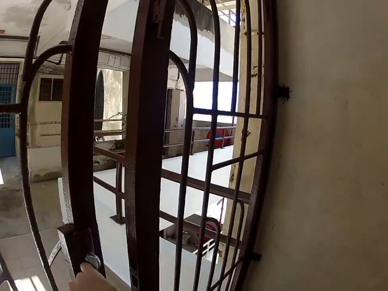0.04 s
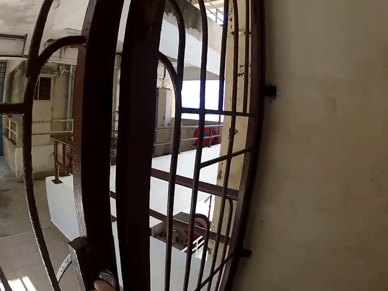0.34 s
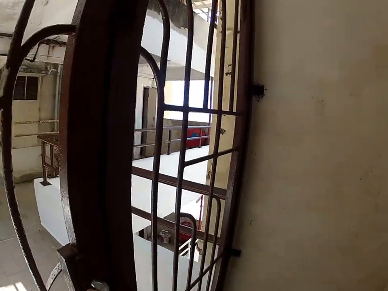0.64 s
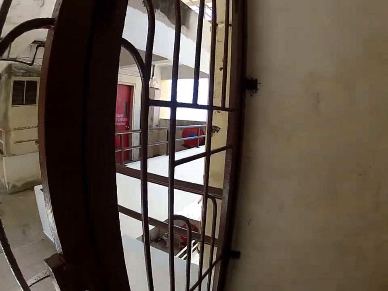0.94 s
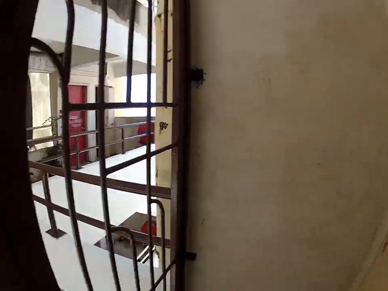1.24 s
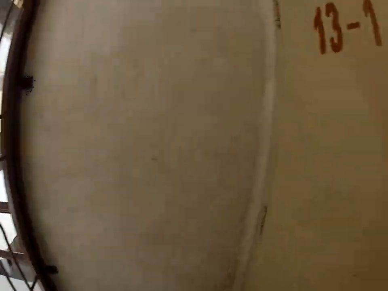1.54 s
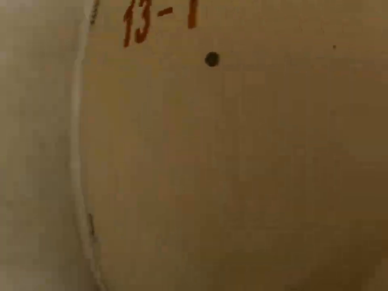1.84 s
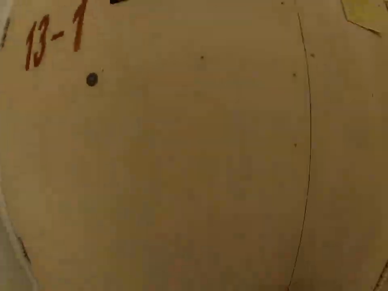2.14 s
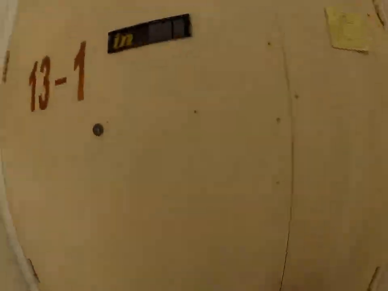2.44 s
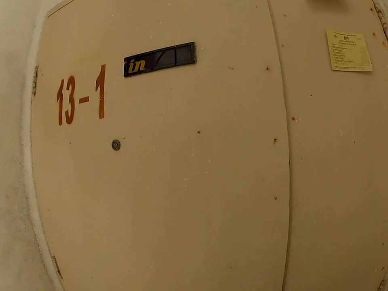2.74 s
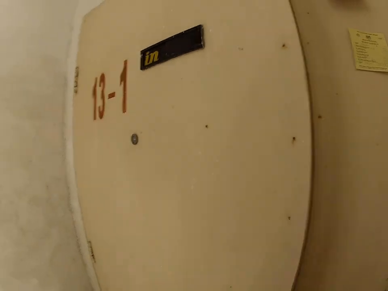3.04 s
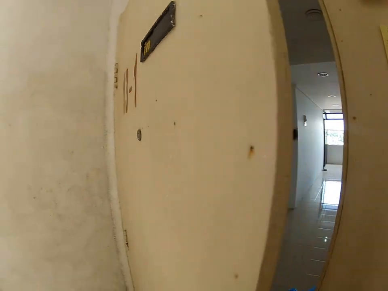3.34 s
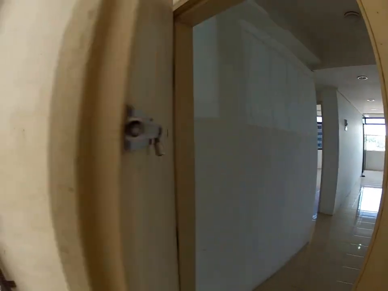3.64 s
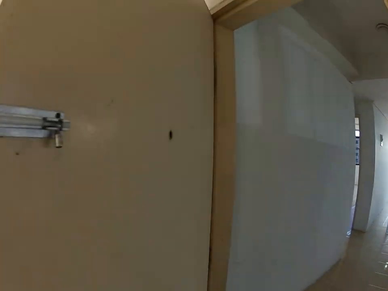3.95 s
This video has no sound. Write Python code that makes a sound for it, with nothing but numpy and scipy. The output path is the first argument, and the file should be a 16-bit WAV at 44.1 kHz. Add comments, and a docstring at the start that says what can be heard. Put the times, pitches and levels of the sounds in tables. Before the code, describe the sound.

A barred metal gate rattles and bangs shut, then a wooden door clunks open.

```python
"""Steel gate and wooden door in a corridor

A barred steel gate shudders on its hinges, bangs into its frame and rattles to rest, each impact
exciting the modes of its bars. Then a handle is worked; a wooden door thumps in its frame, comes free
with a clunk and swings open. Concrete walls reverberate, and a low-rate sample-and-hold mirrors
the spectrum into a glassy treble."""
import sys
import numpy as np
from scipy import signal
from scipy.fft import rfft, irfft
from scipy.io import wavfile
from scipy.ndimage import uniform_filter1d

SR = 44100
rng = np.random.default_rng(int(sys.argv[2]) if len(sys.argv) > 2 else 0)


def wrap_up_sound(samples):
    """Save the sound to the file named by the first command line argument, as 16-bit audio."""
    columns = np.atleast_2d(samples).T
    # keep every value between -1 and 1, then stretch to whole-number steps
    tamed = np.clip(columns, -1, 1)
    steps = np.round(tamed * 32767).astype(np.int16)
    wavfile.write(sys.argv[1], SR, steps)


N = 176400
T = np.arange(N) / SR

# bright snap as two metal parts first touch: frequency_hz, density_db
SNAP_SPECTRUM = [(1000, -24), (3000, -5), (5500, -12)]
# handle and latch metal: frequency_hz, density_db
LATCH_SPECTRUM = [(150, -25), (600, 0.5), (1300, 4.5), (2000, -6), (3000, -8.5), (4000, -17), (5600, -21)]
SNAP_T60_S = 0.031


def amp(db):
    """Decibels to amplitude ratio."""
    return 10 ** (np.asarray(db) / 20)


def unit(x):
    """Normalisation to rms 1."""
    return x / np.sqrt(np.mean(x ** 2) + 1e-20)


def read(points, hz):
    """Interpolation on a logarithmic frequency axis."""
    f, value = np.transpose(points)
    return np.interp(np.log(hz + 1), np.log(f + 1), value)


def add(mix, start_s, sound):
    """Superposition of a delayed sound on the mix."""
    part = mix[max(round(start_s * SR), 0):][:len(sound)]
    part += sound[:len(part)]


def noise(spectrum, size):
    """Random phases under a given spectrum make coloured noise, rms 1."""
    hz = np.fft.rfftfreq(size, 1 / SR)
    return unit(irfft(amp(read(spectrum, hz)) * np.exp(2j * np.pi * rng.random(len(hz))), size))


def wander(rate_hz, size):
    """Low-passed noise gives a smooth random fluctuation, rms 1."""
    hz = np.fft.rfftfreq(size, 1 / SR)
    spectrum = np.exp(-(hz / rate_hz) ** 2 + 2j * np.pi * rng.random(len(hz)))
    return unit(irfft(spectrum * (hz > 0), size))


def burst(spectrum, t60, rise_s, size=32768):
    """Densely overlapping modes act as noise, each band decaying at its own rate."""
    hz, t, bands = signal.stft(noise(spectrum, size), SR, nperseg=256)
    decay = amp(-60 * t / np.maximum(read(t60, hz), 1e-3)[:, None])
    sound = signal.istft(bands * decay, SR, nperseg=256)[1][:size]
    return sound * np.minimum(T[:size] / rise_s, 1)


def ring(modes, rise_s, size=44100, scatter=1):
    """Free vibration is a sum of damped sinusoids; with no scatter they start in phase."""
    hz, db, t60 = np.transpose(modes)[:, :, None]
    t, gain = T[:size], amp(db) / np.linalg.norm(amp(db))
    cycles = hz * t + scatter * rng.random(hz.shape)
    waves = gain * amp(-60 * t / t60) * np.sin(2 * np.pi * cycles)
    return np.sqrt(2) * waves.sum(0) * np.minimum(t / rise_s, 1)


def air():
    """Ambient noise: the dull, nearly steady rumble of the open building."""
    # rumble colour: frequency_hz, density_db
    spectrum = [(15, -41), (28, -4.5), (45, -2), (78, 0), (105, -11.5), (141, 0), (200, -9), (255, -7.5),
                (297, -5.5), (340, -12.5), (570, -14.5), (700, -23.5), (1100, -25), (1450, -31),
                (1900, -39.5), (2400, -41), (4000, -51), (5400, -54)]
    # rumble envelope: time_s, level_db
    levels = [(0, -34), (1.2, -34.5), (1.7, -34.5), (2.3, -33), (2.6, -33), (3.0, -33.5), (3.4, -33.5),
              (4, -34.5)]
    return unit(noise(spectrum, N)) * amp(np.interp(T, *np.transpose(levels)))


def corridor(x):
    """Reverberation: convolution with the diffuse reflections from concrete walls."""
    # colour of the reflections: frequency_hz, density_db
    spectrum = [(60, 1), (400, -2), (1500, -10), (5500, -7)]
    # reverberation times: frequency_hz, t60_s
    decay = [(100, 1), (500, 0.63), (1500, 0.88), (5000, 0.39)]
    tail = burst(spectrum, decay, rise_s=0.014, size=44100)
    return signal.fftconvolve(x, tail / np.linalg.norm(tail))[:N]


def ticks(rustle_db=-6):
    """Close ticks are heard as direct sound only: a heavily damped pulse and a brief rustle."""
    # ticks: start_s, level_db
    events = [(2.178, -28.5), (3.3745, -20), (3.5498, -17)]
    # modes of the pulse: pitch_hz, level_db, t60_s
    modes = [(430, 1, 0.017), (820, 1.5, 0.0093), (1340, 1, 0.0066), (2400, -12.5, .006),
             (4520, -27, 0.0017)]
    # rustle colour: frequency_hz, density_db
    spectrum = [(100, 3), (500, 19), (1200, -3.5), (2500, -9.5), (5500, -37.5)]
    # rustle damping: frequency_hz, t60_s
    decay = [(300, 0.027), (1200, 0.013), (5000, 0.0078)]
    out, t = np.zeros(N), T[:4096]
    pulse = sum(amp(db - 60 * t / t60) * np.sin(2 * np.pi * hz * t) for hz, db, t60 in modes)
    for s, db in events:
        rustle = amp(rustle_db) * burst(spectrum, decay, rise_s=0.0004, size=4096)
        add(out, s, amp(db) * (pulse / abs(pulse).max() + rustle))
    return out


def bolt_scrape(level_db=-46, grain_db=4):
    """Sliding friction: the bolt drags on its plate, swelling with pressure until it slips."""
    # friction envelope: time_s, gain_db
    drag = [(2.5, -51), (2.57, -11.5), (2.67, 0), (2.72, 1), (2.85, -50), (3.12, -50), (3.18, -2),
            (3.21, 12.5), (3.25, -37)]
    swell_db = np.interp(T, *np.transpose(drag))
    return amp(level_db + swell_db) * noise(LATCH_SPECTRUM, N) * unit(amp(grain_db * wander(150, N)))


def panel_drone(pitch_hz=144.8, waver_hz=4):
    """Forced vibration: the door panel drones while the handle is pressed down."""
    # drone envelope: time_s, level_db
    levels = [(2.48, -70), (2.51, -34), (2.65, -29), (2.72, -51)]
    envelope = amp(np.interp(T, *np.transpose(levels))) * (T > levels[0][0]) * (T < levels[-1][0])
    cycles = np.cumsum(pitch_hz + waver_hz * wander(21, N)) / SR
    return envelope * np.sqrt(2) * np.sin(2 * np.pi * cycles)


def door_thumps(rise_s=0.0054):
    """Impact on the frame starts the door's low modes in phase, with a broadband knock."""
    # impacts: start_s, panel_db, sway_db, knock_db
    thumps = [(2.488, -25.5, -21.5, -38.5), (2.732, -18, -19, -22.5), (2.745, -20, -34, -32),
              (2.80, -45, -28, -30.5), (2.865, -23, -30, -53), (2.954, -30, -40, -54),
              (3.053, -14.5, -36, -28), (3.119, -22.5, -45, -32.5), (3.232, -25.5, -14, -17.5)]
    # panel modes: pitch_hz, level_db, t60_s
    panel = [(167.3, -0.5, 0.22), (265.7, -20.5, 0.29), (348, -17, 0.23), (441, -21.5, 0.16)]
    # swaying modes: pitch_hz, level_db, t60_s
    sway = [(48, 5, 0.11), (69.6, 7.5, 0.11)]
    # knock colour: frequency_hz, density_db
    knock = [(40, -25), (120, 5.5), (330, -0.5), (700, -7), (1300, -14.5), (2000, -39), (5000, -36)]
    # knock damping: frequency_hz, t60_s
    decay = [(100, 0.14), (500, 0.24), (2000, 0.14)]
    out = np.zeros(N)
    for s, panel_db, sway_db, knock_db in thumps:
        add(out, s, amp(panel_db) * ring(panel, rise_s, size=22050, scatter=0))
        add(out, s, amp(sway_db) * ring(sway, rise_s, size=22050, scatter=0))
        add(out, s, amp(knock_db) * burst(knock, decay, rise_s=0.0011, size=16384))
    return out


def handle(snap_db=-13.5):
    """Brief metal contacts in the latch give broadband clicks; the handle's spring resonates."""
    # latch contacts: start_s, level_db, t60_s
    clicks = [(2.686, -30, 0.14), (2.702, -32, 0.19), (2.733, -52, .12), (2.7918, -34, .06),
              (2.804, -40, .12), (3.0503, -41.5, 0.057), (3.2114, -18.5, 0.19), (3.562, -40, .06),
              (3.6416, -40.5, 0.06), (3.652, -46, 0.087), (3.7673, -40, 0.076)]
    # spring chirps: start_s, level_db
    chirps = [(2.5727, -47), (2.593, -46), (2.6276, -45)]
    # spring modes: pitch_hz, level_db, t60_s
    spring = [(1850, 2, .07), (1766, 2, 0.079), (2710, -17, .04)]
    out = np.zeros(N)
    for s, db, t60 in clicks:
        click = burst(LATCH_SPECTRUM, [(1000, t60)], rise_s=0.0013, size=16384)
        snap = burst(SNAP_SPECTRUM, [(1000, SNAP_T60_S)], rise_s=0.0004, size=4096)
        add(out, s, amp(db) * click)
        add(out, s, amp(db + snap_db) * snap)
    for s, db in chirps:
        add(out, s, amp(db) * ring(spring, rise_s=0.0023, size=8192))
    return out


def door_release():
    """Transient excitation: the door jerks free in three clunks, each duller than the last."""
    # clunks: start_s, level_db, tilt_db_per_octave
    clunks = [(3.218, -13.5, 4), (3.238, -18.5, -1), (3.258, -24.5, -8)]
    # modes of a clunk: pitch_hz, level_db, t60_s
    modes = [(253.4, -1.5, 0.2), (317, -1.5, 0.17), (463, -0.5, 0.14), (630, 1.5, .1), (942, -3.5, .1),
             (1010, -6.5, 0.063), (1160, -4.5, .1), (1477, -5, 0.076), (1770, -18, 0.14),
             (1946, -8.5, 0.047), (2800, -11.5, 0.038), (3050, -18, 0.043)]
    out = np.zeros(N)
    for s, db, tilt in clunks:
        tilted = [(hz, level + tilt * np.log2(hz / 1000), t60) for hz, level, t60 in modes]
        add(out, s, amp(db) * ring(tilted, rise_s=0.0032, size=16384))
    return out


def bar_singing(centre_hz=4540, width_hz=880):
    """The bars sing faintly in a narrow band: a high tone, amplitude-modulated by noise."""
    # singing envelope: time_s, level_db
    levels = [(.9, -71.5), (1.17, -64.5), (1.4, -69), (1.65, -70), (1.9, -80)]
    band = np.sqrt(2) * wander(width_hz / 2, N) * np.sin(2 * np.pi * centre_hz * T)
    return band * amp(np.interp(T, *np.transpose(levels)))


def gate_hum(waver_db=2, waver_hz=3, fade_db_per_s=100):
    """The gate's fundamental mode wavers in pitch and level as it swings."""
    # course of the fundamental: time_s, pitch_hz, level_db
    course = [(0, 128.7, -41.5), (.17, 123.8, -42), (.28, 126.1, -32.5), (.55, 125.1, -32.5),
              (.68, 130.5, -33.5), (.9, 135.3, -31.5), (1.1, 134.5, -45.5), (1.348, 130, -54),
              (1.552, 133, -41), (1.85, 140, -52)]
    s, hz, db = np.transpose(course)
    cycles = np.cumsum(np.interp(T, s, hz) + waver_hz * wander(9.8, N)) / SR
    level_db = np.interp(T, s, db) + waver_db * wander(21, N) - fade_db_per_s * np.maximum(T - s[-1], 0)
    return np.sqrt(2) * np.sin(2 * np.pi * cycles) * amp(level_db)


def gate_throb(beat_hz=6.62, twin_db=-3.5, waver_hz=1.96, fade_db_per_s=130):
    """Beating: two close modes of the uprights interfere at their difference frequency."""
    # course of the upper mode: time_s, pitch_hz, level_db
    course = [(0, 303, -26.5), (.25, 303, -31), (.5, 302, -38.5), (.62, 290, -35), (.85, 288, -28.5),
              (1.03, 289, -34), (1.3, 289, -40), (1.7, 290, -44)]
    s, hz, db = np.transpose(course)
    cycles = np.cumsum(np.interp(T, s, hz) + waver_hz * wander(7.1, N)) / SR
    pair = np.sin(2 * np.pi * cycles) - amp(twin_db) * np.sin(2 * np.pi * (cycles - beat_hz * T))
    return pair * amp(np.interp(T, s, db) - fade_db_per_s * np.maximum(T - s[-1], 0))


def steel_impacts(blows, modes, dense_modes, contact, snap_db, detune=0.0028, grain_db=2.5):
    """Impact excitation: each contact gives a gritty clash and a snap, then the bars ring freely."""
    # damping of the strong modes: frequency_hz, t60_s
    mode_decay = [(300, 0.65), (400, 0.92), (900, 0.54), (1500, 0.45), (3000, 0.38)]
    # damping of the dense modes: frequency_hz, t60_s
    dense_decay = [(150, 0.9), (350, 1), (800, 0.88), (1400, 0.48), (2500, 0.47), (5000, 0.59)]
    # damping of the clash: frequency_hz, t60_s
    clash_decay = [(300, 0.068), (1500, 0.21), (5000, 0.1)]
    out = np.zeros(N)
    for s, ring_db, clash_db in blows:
        # the changing contact shifts each mode from blow to blow
        bars = [(hz * (1 + detune * rng.standard_normal()), db, read(mode_decay, hz)) for hz, db in modes]
        clash = burst(contact, clash_decay, rise_s=0.00027, size=8192)
        grit = unit(amp(grain_db * wander(430, len(clash))))
        snap = burst(SNAP_SPECTRUM, [(1000, SNAP_T60_S)], rise_s=0.00037, size=4096)
        add(out, s, amp(clash_db) * clash * grit)
        add(out, s, amp(clash_db + snap_db) * snap)
        add(out, s, amp(ring_db - 3) * burst(dense_modes, dense_decay, rise_s=0.0033))
        add(out, s, amp(ring_db - 2) * ring(bars, rise_s=0.0033))
    return out


def gate_shudder():
    """Repeated impacts at the hinges excite the modes of the swinging leaf."""
    # hinge impacts: start_s, ring_db, clash_db
    blows = [(0.0, -21, -23.5), (0.02, -19.5, -31), (0.045, -27, -34), (0.078, -26, -43), (0.108, -30, -30),
             (0.135, -26, -46), (0.1805, -26, -45), (0.235, -39, -51), (0.342, -36, -60),
             (0.4174, -35, -52), (0.4409, -35, -42.5), (0.5367, -36.5, -44)]
    # strong leaf modes: pitch_hz, level_db
    modes = [(380, -42), (423, -36), (727, -36), (788, -49), (835, -36), (926, -27.5), (1030, -69),
             (1175, -39), (1233, -34), (1346, -30.5), (1459, -48), (1701, -45.5), (2869, -52.5)]
    # dense, weaker bar modes: frequency_hz, density_db
    dense_modes = [(80, -31), (220, 0.5), (420, -3.5), (560, -5.5), (800, -2), (1100, -1), (1450, 4.5),
                   (1750, -10.5), (2200, -22.5), (2900, -19.5), (3600, -32.5), (5500, -39.5)]
    # hinge clash: frequency_hz, density_db
    contact = [(100, -22), (500, -5), (950, -1), (1450, -0.5), (2100, -26), (2900, -8.5), (3800, -29),
               (5600, -32)]
    return steel_impacts(blows, modes, dense_modes, contact, snap_db=-22)


def gate_bang():
    """Inelastic collisions: the leaf strikes the frame and rebounds until it comes to rest."""
    # strike and rebounds: start_s, ring_db, clash_db
    blows = [(0.5795, -19, -14.5), (0.5925, -22, -17.5), (0.607, -21.5, -18), (0.65, -27, -56),
             (0.7088, -22, -28), (0.7667, -23, -33), (0.7871, -27.5, -24.5), (0.812, -24.5, -26),
             (0.8879, -40, -38), (0.902, -32, -28), (0.9443, -33.5, -29.5), (0.985, -32, -38),
             (1.0256, -40, -27), (1.2092, -39.5, -41), (1.2605, -40.5, -36.5), (1.3848, -46.5, -35.5),
             (1.41, -37, -40), (1.53, -43, -52), (1.66, -44, -49)]
    # strong frame modes: pitch_hz, level_db
    modes = [(258, -25.5), (372, -28.5), (412, -39.5), (463, -36), (641, -38.5), (735, -33.5), (829, -40),
             (925, -41.5), (1034, -44), (1170, -34.5), (1319, -31.5), (1475, -48), (2363, -49.5)]
    # dense, weaker bar modes: frequency_hz, density_db
    dense_modes = [(80, -10), (170, -2.5), (230, -2.5), (380, -1.5), (600, -0.5), (800, -7), (1000, -4.5),
                   (1400, -1), (1800, -12), (2500, -22), (4000, -32.5), (5500, -38.5)]
    # clash of steel on steel: frequency_hz, density_db
    contact = [(100, -37), (400, 0.5), (900, 1.5), (1100, -1.5), (1350, 6), (1600, -7.5), (1900, -12.5),
               (2800, -17), (4200, -18.5), (5600, -27.5)]
    return steel_impacts(blows, modes, dense_modes, contact, snap_db=-16.5)


def scene(gate_wet_db=-17.5, door_wet_db=-18.5):
    """Superposition of direct sound, reverberation and ambient noise, in mono."""
    gate = gate_shudder() + gate_bang()
    door = door_thumps() + handle() + door_release() + panel_drone() + bolt_scrape()
    reverberation = corridor(amp(gate_wet_db) * gate + amp(door_wet_db) * door)
    gate_tones = gate_hum() + bar_singing() + gate_throb()
    return (gate + door + reverberation + gate_tones + ticks() + air())[None]


def record(dry, hold_hz=12000, hold_steps=4, cutoff_hz=15350):
    """Spectral imaging: a zero-order hold at a low rate mirrors the sound upward, below a final cutoff."""
    # anti-aliasing low-pass: frequency_hz, gain_db
    guard = [(4600, 1), (5200, 2), (5550, -4.5), (5800, -10), (6100, -41), (6500, -70)]
    response = amp(read(guard, np.fft.rfftfreq(2 * N, 1 / SR)))
    guarded = irfft(rfft(dry, 2 * N) * response)[:, :N]
    samples = signal.resample(guarded, N * hold_hz // SR, axis=1)
    held = signal.resample(np.repeat(samples, hold_steps, axis=1), N, axis=1)
    lowpass = signal.firwin(511, cutoff_hz, window=("kaiser", 9), fs=SR)
    return signal.oaconvolve(held, lowpass[None], "same")


dry = scene()
out = record(dry)
wrap_up_sound(out)
```